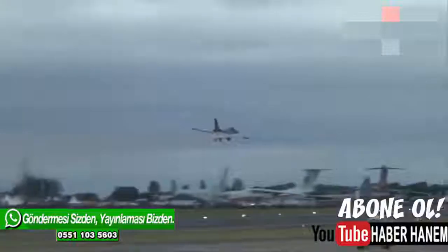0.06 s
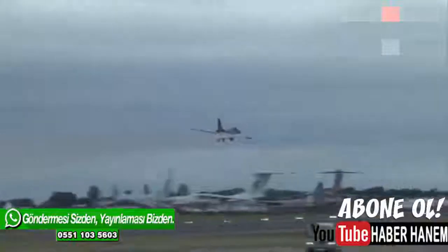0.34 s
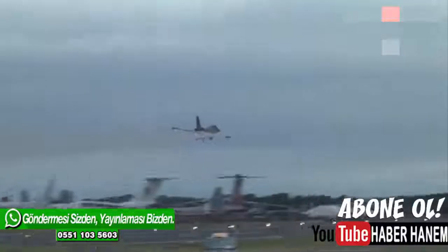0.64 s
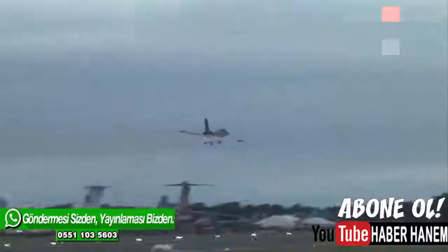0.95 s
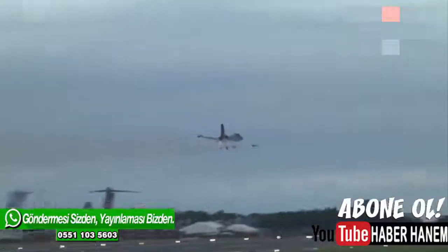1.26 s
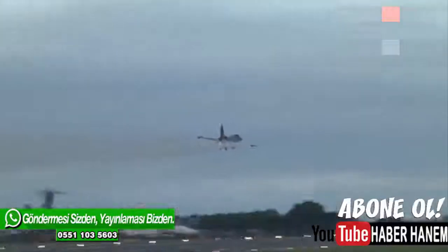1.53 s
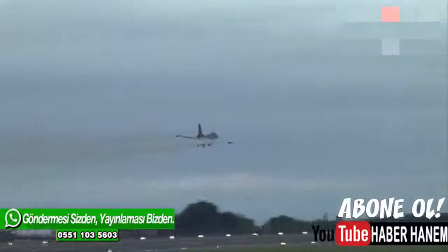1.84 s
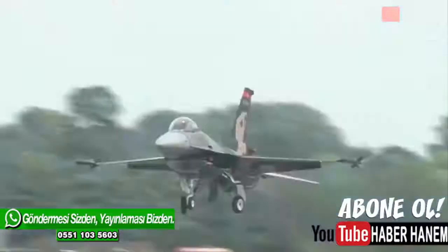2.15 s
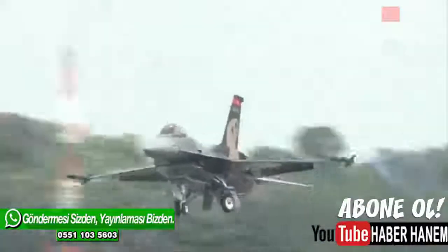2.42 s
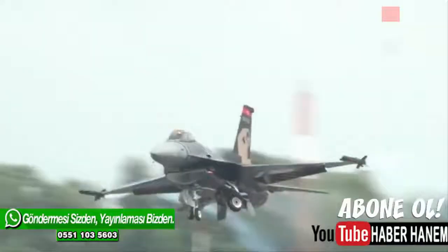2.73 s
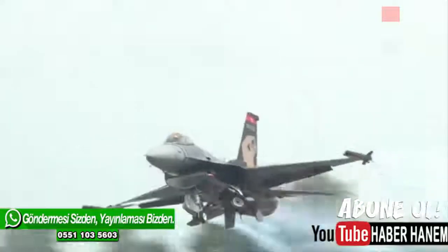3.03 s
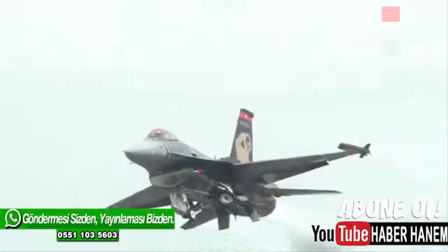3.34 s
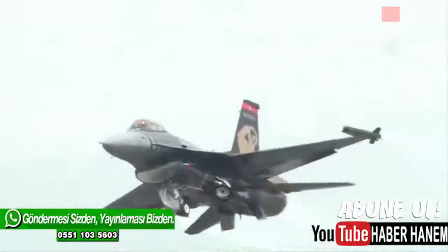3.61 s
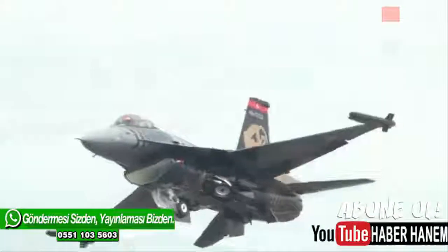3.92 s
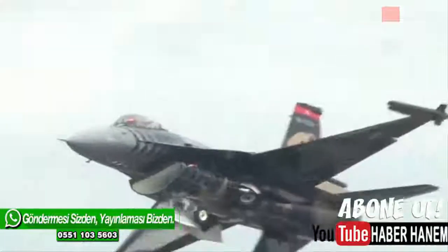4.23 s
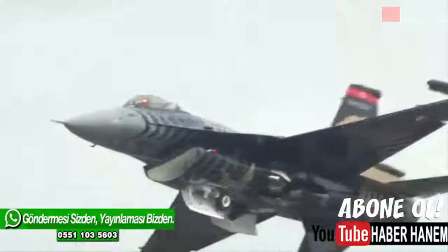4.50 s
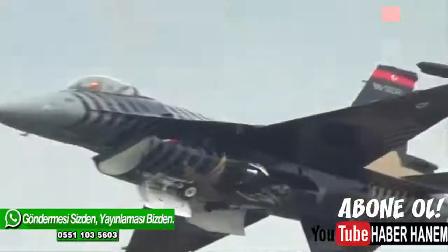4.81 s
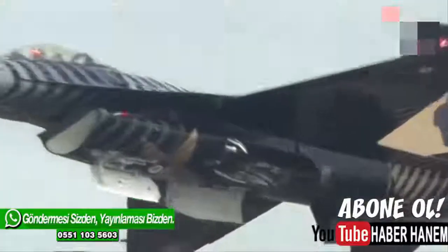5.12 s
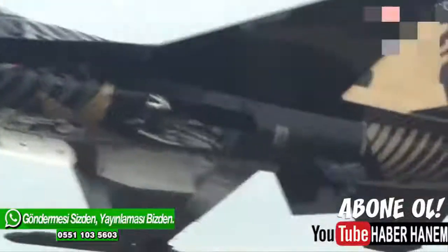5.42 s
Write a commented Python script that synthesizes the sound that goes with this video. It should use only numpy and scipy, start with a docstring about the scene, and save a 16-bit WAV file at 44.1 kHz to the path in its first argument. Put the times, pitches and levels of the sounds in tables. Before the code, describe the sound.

Far-off jet exhaust rumbles and howls, drops away suddenly, then swells into a close, crackling low pass.

```python
"""Fighter jet low over an airfield

Two views joined by a hard cut. First the exhaust roars from afar, with a wandering howl, a faint high whistle
and the colour of a ground reflection. Then the jet comes in head-on, quiet at first under a light breeze, and
swells until the crackling exhaust sweeps past the microphone."""
import sys
import numpy as np
from scipy import signal
from scipy.fft import rfft, irfft, next_fast_len
from scipy.io import wavfile
from scipy.ndimage import uniform_filter1d, map_coordinates

SR = 44100
rng = np.random.default_rng(int(sys.argv[2]) if len(sys.argv) > 2 else 0)


def wav_out(sig):
    """Save sig, one row per channel (or a flat mono array), as 16-bit PCM at SR to the path in sys.argv[1]."""
    wavfile.write(sys.argv[1], SR, np.round(np.clip(np.atleast_2d(sig).T, -1, 1) * 32767).astype(np.int16))


N = 249606

# Tone of each noise layer. Each row: frequency in Hz, relative level in dB.
NEAR_RUMBLE_EQ = [(12, -28), (25, -20), (50, -5.5), (85, 3), (115, -2), (160, -7.5), (210, -13), (300, -30),
                  (500, -77)]
NEAR_ROAR_EQ = [(100, -50), (180, -10.5), (250, -4), (320, 2), (520, 0), (700, -3.5), (900, -6.5),
                (1100, -9), (1400, -19.5), (3000, -76)]
NEAR_RASP_EQ = [(600, -58), (1000, -7.5), (1200, -1.5), (1900, -1), (2400, -4.5), (3000, -6.5),
                (3600, -11.5), (4200, -17.5), (4900, -30), (6500, -52)]
FAR_RUMBLE_EQ = [(12, -20), (25, -11.5), (45, -1.5), (90, 0), (150, -5), (210, -8), (300, -34), (500, -68)]
FAR_ROAR_EQ = [(100, -50), (170, -7.5), (220, 1), (320, -0.5), (500, 1), (620, -2.5), (800, -4.5),
               (1000, -11), (1200, -17), (1600, -24), (3000, -90)]
FAR_RASP_EQ = [(600, -57), (1000, -0.5), (1220, -8), (1450, 1), (2000, -1), (2300, -2.5), (2700, -2.5),
               (3000, -8), (3350, -11), (3600, -21), (4000, -33), (5000, -55)]
FIZZ_EQ = [(2000, -50), (3600, 0), (4500, 3), (6500, -2), (8000, -4), (10000, -7), (12000, -9),
           (15500, -11)]
BREEZE_EQ = [(12, -3), (25, 2.5), (50, 6.5), (75, 3.5), (110, -8), (250, -50.5), (800, -110)]
HISS_EQ = [(1000, -22), (4000, -2), (10000, -5), (15500, 0)]
# Surges of the approach. Each row: crest in seconds, half length in seconds, howl pitch in Hz,
# howl lift in dB, roar gain in dB, rasp gain in dB.
SURGES = [(2.867, 0.092, 472, 6.5, 6, 2.5), (3.196, .22, 400, -1, 0.5, 1.5), (3.86, 0.15, 393, 8, 1.5, -1),
          (4.594, 0.26, 339, 8, 0.5, .5), (5.024, 0.12, 397, 5.5, 2.5, -1.1),
          (5.193, .12, 520, 1.5, 0, 2.5)]
# The strongest shocks as the exhaust passes. Each row: start in seconds, level in dB.
SHOCKS = [(5.4855, -17), (5.5216, -14), (5.5355, -16), (5.538, -15), (5.557, -12)]
# Swells of the distant howl. Each row: crest in seconds, half length in seconds, top pitch in Hz,
# howl lift in dB, gain of the whole roar in dB.
FAR_HOWLS = [(0.324, 0.29, 757, 10, .5), (0.872, 0.18, 460, 14, 1.5), (1.356, 0.036, 470, 16, 0.5),
             (1.84, 0.15, 347, 12.5, 2)]
# How well the air carries the distant treble. Each row: time in seconds, carry in dB.
CARRY = [(0, 2), (.2, 2), (.35, 5.3), (.53, 3.5), (.68, -1.5), (.9, 0.5), (1.6, -2), (1.96, 1.2),
         (2.02, -3.5)]
# Notches in the distant fizz. Each row: centre in Hz, width in Hz, gain in dB.
FIZZ_NOTCHES = [(4030, 170, -1), (7800, 290, -11), (11760, 240, -7)]
# Gusts on the microphone. Each row: crest in seconds, lift over the lull in dB.
GUSTS = [(2.09, 8.5), (2.22, 7.5), (2.35, 7), (2.49, 7.5), (2.8, 3), (3.02, 4)]
# Layers of the fly-past. Each holds: level abreast in dB, source length in metres, loss per tenfold
# range in dB, gain from the climb in dB, gain in the exhaust cone in dB.
NEAR_RUMBLE = (-25.5, 67.5, 22.5, 9.5, 1.5)
NEAR_ROAR = (-13, 43.5, 21, 8, 14.5)
NEAR_RASP = (-25, 12.5, 25.5, 2.5, 3.5)
# Distant layers. Each holds: base level in dB, dB gained per dB of carry.
FAR_RUMBLE, FAR_ROAR, FAR_RASP = (-27.5, -0.53), (-25.5, 0.49), (-36.5, 1.02)
# Cues of the fly-past. Each holds: midpoint in seconds, transition width in seconds.
CLIMB = (4.436, 0.11)  # the jet climbs clear of the ground, which had soaked up the low roar
CONE = (5.478, 0.02)  # the loud cone of the exhaust reaches the microphone
BEHIND = (5.58, 0.0087)  # the dull side of the plume turns to the microphone

CUT_S = 2.023  # from the distant view to the approach
ABREAST_S, SPEED_M_PER_S, MISS_M = 5.554, 119.2, 21.1  # a straight pass at a steady speed
# Rasp tilt in dB per octave: base value, loss per tenfold range, loss behind the jet.
BRIGHT_TILT, AIR_TILT, BEHIND_TILT = 4.5, 7.5, 7.5
HOWL_HZ, CONE_HOWL_HZ, HOWL_DB, CONE_EXTRA_DB = 372, 461, 3, 4  # the near howl, head-on and in the cone


def approaching_jet(t):
    """The exhaust grows louder and brighter as it nears, crackles past and turns dull."""
    roar_db, rasp_db = sum(np.outer(gains_db, swell(t, s, half_s))
                           for s, half_s, _, _, *gains_db in SURGES)
    rumble = pass_gain(t, *NEAR_RUMBLE) * turbulence(NEAR_RUMBLE_EQ, patchy_db=3)
    roar = howling(turbulence(NEAR_ROAR_EQ, patchy_db=1.5), near_howls, octaves=0.16)
    roar *= amp(roar_db) * pass_gain(t, *NEAR_ROAR)
    rasp = amp(rasp_db) * pass_gain(t, *NEAR_RASP) * near_rasp()
    flutter_db = 0.61 * wobble(22.41) + 0.5 * wobble(120)
    jet = rumble + (roar + rasp) * amp(flutter_db)
    return jet + fizz(jet, gain_db=-5) + crackle(relax_s=0.00046)


def near_rasp():
    """The top of the exhaust noise: a long air path absorbs treble, and the plume is dull from behind."""
    hz, t, bands = signal.stft(turbulence(NEAR_RASP_EQ, patchy_db=1), SR, nperseg=512)
    tilt = BRIGHT_TILT - AIR_TILT * range_decades(t, 0) - BEHIND_TILT * fade_in(t, *BEHIND)
    octaves = np.log2(np.maximum(hz[:, None], 1000) / 2000)
    return steady(signal.istft(bands * amp(tilt * octaves), SR, nperseg=512)[1][:N])


def near_howls(t):
    """A held howl jumps up inside the exhaust cone; surges colour it at pitches of their own."""
    cone = fade_in(t, *CONE)
    held = (HOWL_HZ + (CONE_HOWL_HZ - HOWL_HZ) * cone, HOWL_DB + CONE_EXTRA_DB * cone)
    return [held] + [(hz, db * swell(t, s, half_s)) for s, half_s, hz, db, _, _ in SURGES]


def crackle(relax_s):
    """Each shock is a sudden rise of pressure that relaxes through a shallow dip."""
    out = np.zeros(N)
    age = np.arange(SR // 100) / SR / relax_s
    for s, db in SHOCKS:
        out[round(s * SR):][:len(age)] += amp(db) * (1 - age) * np.exp(-age)
    return out


def pass_gain(t, abreast_db, length_m, spread_db, climb_db, cone_db):
    """One layer's fader: it follows the range and opens up with the climb and the cone."""
    held_back_db = climb_db * (1 - fade_in(t, *CLIMB)) + cone_db * (1 - fade_in(t, *CONE))
    return amp(abreast_db - spread_db * range_decades(t, length_m) - held_back_db)


def range_decades(t, length_m):
    """Tenfold steps of range beyond the closest point; a long source never seems very near."""
    nearest_m = np.hypot(MISS_M, length_m)
    return np.log10(np.hypot(SPEED_M_PER_S * (t - ABREAST_S), nearest_m) / nearest_m)


def distant_jet(t):
    """Full exhaust roar from across the field, fluttering in the moving air."""
    carry_db = np.interp(t, *np.transpose(CARRY))
    rumble_db, roar_db, rasp_db = [db + follow * carry_db
                                   for db, follow in (FAR_RUMBLE, FAR_ROAR, FAR_RASP)]
    rumble_db += 2.9 * swell(t, 1.17, half_s=0.18)  # the low end wells up once
    roar_db += sum(db * swell(t, s, half_s) for s, half_s, _, _, db in FAR_HOWLS)
    rumble = amp(rumble_db) * turbulence(FAR_RUMBLE_EQ, patchy_db=2)
    roar = amp(roar_db) * howling(turbulence(FAR_ROAR_EQ, patchy_db=2), far_howls, octaves=0.13)
    rasp = amp(rasp_db) * ground_reflection(turbulence(FAR_RASP_EQ, patchy_db=2.5), carry_db)
    flutter_db = 0.81 * wobble(25.03) + 0.57 * wobble(130)
    jet = rumble + (roar + rasp) * amp(flutter_db)
    return jet + notched(fizz(jet, gain_db=-6)) + high_whistle(t)


def far_howls(t, arch_octaves=0.13):
    """Each howl rises in pitch as it swells and sinks as it fades."""
    howls = []
    for s, half_s, hz, db, _ in FAR_HOWLS:
        sag_octaves = arch_octaves * np.minimum(((t - s) / half_s) ** 2, 2)
        howls.append((hz * 2 ** -sag_octaves, db * swell(t, s, half_s)))
    return howls


def ground_reflection(x, carry_db, share=0.12):
    """The ground returns a slightly later copy, closer behind when the air carries well."""
    comb_hz = 650 + 7.5 * carry_db
    bounce = map_coordinates(x, [np.arange(N) - SR / comb_hz], order=1)
    return unit(x + share * bounce)


def turbulence(eq, patchy_db):
    """Noise of mixing air; eddies along the path lift and sink patches of its spectrum."""
    bands = signal.stft(rng.standard_normal(N), nperseg=1024)[2]
    eddies = uniform_filter1d(rng.standard_normal(bands.shape), size=3, axis=0)
    eddies = unit(uniform_filter1d(eddies, size=12, axis=1))
    patchy = signal.istft(bands * amp(patchy_db * eddies), nperseg=1024)[1][:N]
    return steady(coloured(patchy, eq))


def howling(x, howls, octaves):
    """Narrow moving boosts make noise howl; howls(t) gives each one's pitch in Hz and lift in dB."""
    hz, t, bands = signal.stft(x, SR, nperseg=2048)
    lift_db = sum(db * np.exp(-0.5 * (np.log2((hz[:, None] + 1) / centre_hz) / octaves) ** 2)
                  for centre_hz, db in howls(t))
    return steady(signal.istft(bands * amp(lift_db), SR, nperseg=2048)[1][:N])


def fizz(jet, gain_db):
    """A gritty fizz rides on the steep flanks of the roar's waveform."""
    return amp(gain_db) * coloured(np.gradient(jet) * rng.standard_normal(N), FIZZ_EQ)


def notched(x):
    """Hollow out a few narrow treble bands."""
    return filtered(x, lambda hz: amp(sum(db * np.exp(-((hz - centre) / width) ** 2)
                                          for centre, width, db in FIZZ_NOTCHES)))


def high_whistle(t, start_hz=8560, sag_hz_per_s=300, blur_hz=130, start_db=-73, fade_db_per_s=4):
    """A faint, blurred high tone that sinks and fades."""
    phase = 2 * np.pi * np.cumsum(start_hz - sag_hz_per_s * t) / SR
    blur = filtered(rng.standard_normal(N), lambda hz: np.exp(-(hz / blur_hz) ** 2))
    return amp(start_db - fade_db_per_s * t) * unit(blur * np.sin(phase))


def breeze(t, lull_db=-55.5, rise_db_per_s=3):
    """Soft low gusts buffet the microphone, heard while the jet is still quiet."""
    gust_db = sum(db * swell(t, s, half_s=0.042) for s, db in GUSTS)
    return amp(lull_db + rise_db_per_s * (t - CUT_S) + gust_db) * turbulence(BREEZE_EQ, patchy_db=0)


def hiss():
    """A faint, even bed of bright noise."""
    return amp(-80) * unit(coloured(rng.standard_normal(N), HISS_EQ))


def amp(db):
    """Decibels to gain."""
    return 10 ** (np.asarray(db) / 20)


def unit(x):
    """Scale to rms 1."""
    return x / np.sqrt(np.mean(x ** 2) + 1e-20)


def steady(x):
    """Ride the slow level of a noise to rms 1."""
    return x / np.sqrt(np.abs(uniform_filter1d(x ** 2, size=SR // 10)) + 1e-20)


def swell(t, s, half_s):
    """A bell of height 1 around the time s."""
    return np.exp(-((t - s) / half_s) ** 2)


def fade_in(t, s, width_s):
    """A smooth step from 0 to 1 around the time s."""
    return 0.5 + 0.5 * np.tanh((t - s) / (2 * width_s))


def wobble(rate):
    """A smooth random curve, rate knots a second."""
    return map_coordinates(rng.standard_normal(1024), [np.arange(N) * rate / SR], mode="wrap")


def filtered(x, response):
    """Shape x with the gain response(hz)."""
    size = next_fast_len(N + SR // 2)
    return irfft(rfft(x, size) * response(np.fft.rfftfreq(size, 1 / SR)), size)[:N]


def coloured(x, eq):
    """Equalise x through (Hz, dB) points on a log axis."""
    points_hz, db = np.transpose(eq)
    return filtered(x, lambda hz: amp(np.interp(np.log(hz + 1), np.log(points_hz), db)))


def scene():
    """The distant view cuts hard to the approach, over a faint hiss."""
    t = np.arange(N) / SR
    far_view = np.clip((CUT_S - t) / 0.00057, 0, 1)
    return (hiss() + far_view * distant_jet(t) + (1 - far_view) * (approaching_jet(t) + breeze(t)))[None]


def record(dry, ceiling=0.48, top_hz=15560):
    """The camera rounds off the highest peaks and keeps nothing above its band limit."""
    rounded = dry[0] / (1 + np.abs(dry[0] / ceiling) ** 6) ** (1 / 6)
    return filtered(rounded, lambda hz: hz < top_hz)[None]


dry = scene()
out = record(dry)
wav_out(out)
```